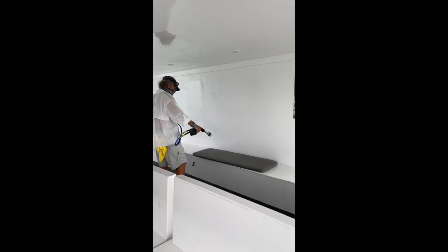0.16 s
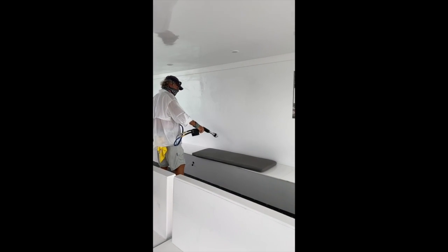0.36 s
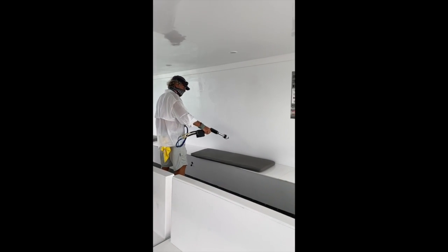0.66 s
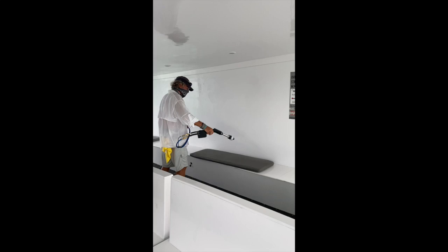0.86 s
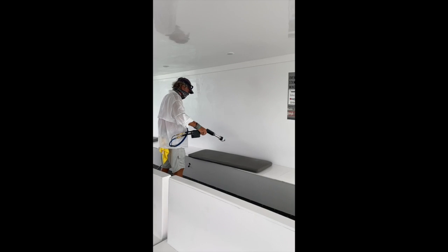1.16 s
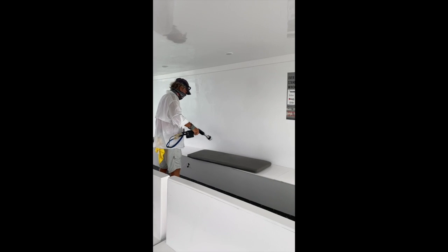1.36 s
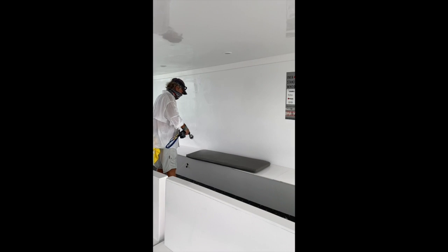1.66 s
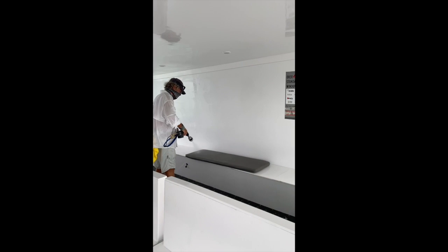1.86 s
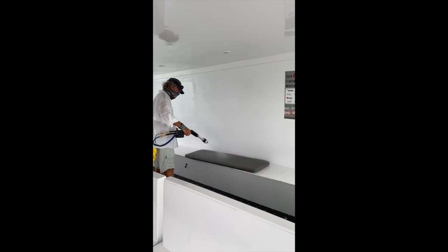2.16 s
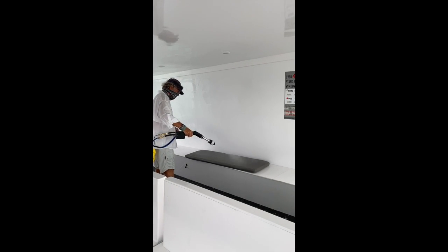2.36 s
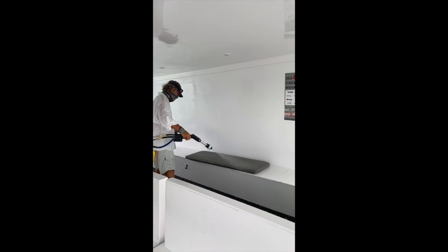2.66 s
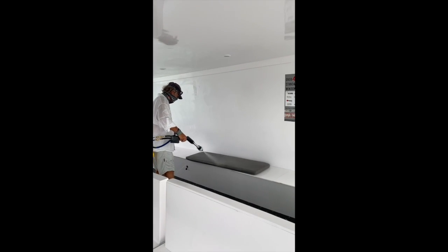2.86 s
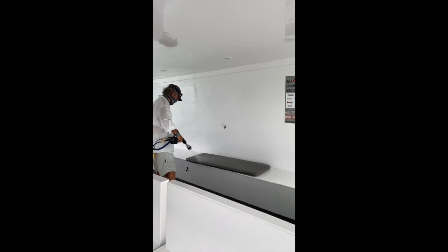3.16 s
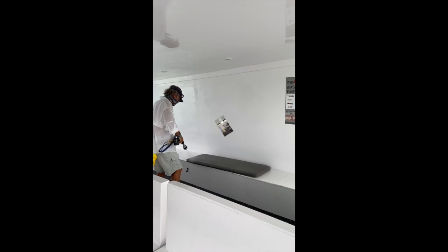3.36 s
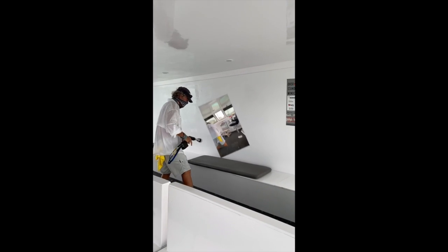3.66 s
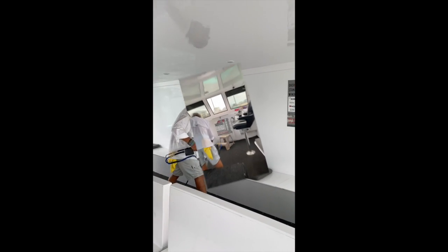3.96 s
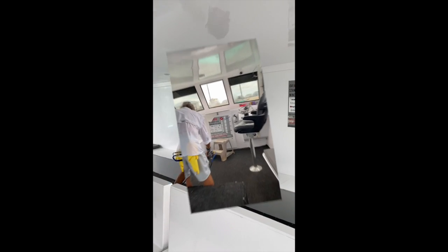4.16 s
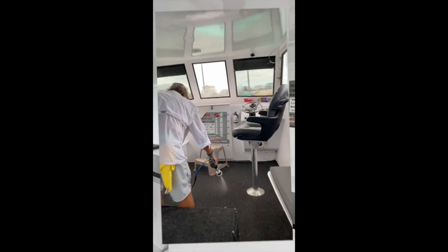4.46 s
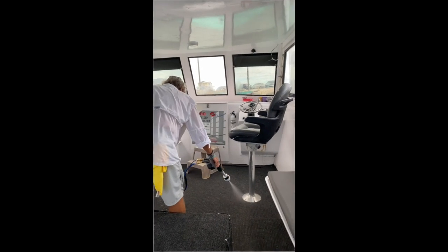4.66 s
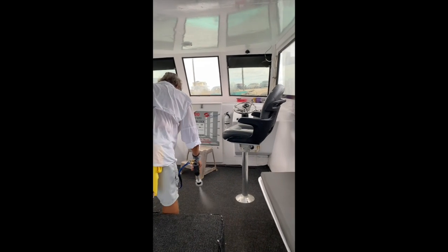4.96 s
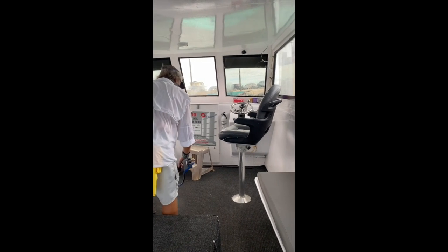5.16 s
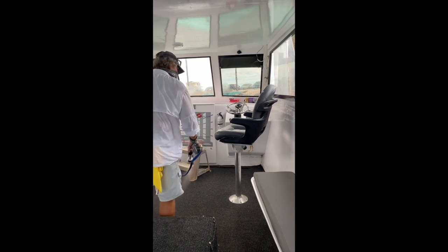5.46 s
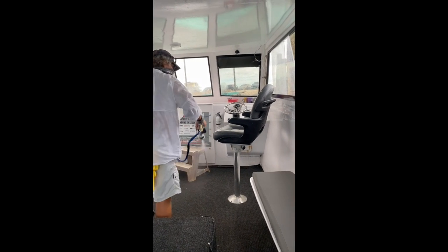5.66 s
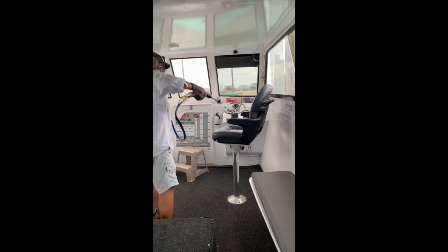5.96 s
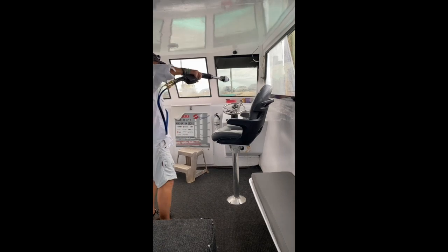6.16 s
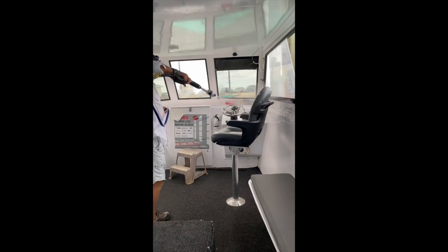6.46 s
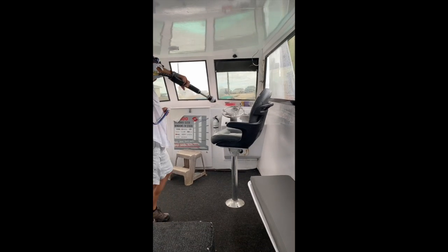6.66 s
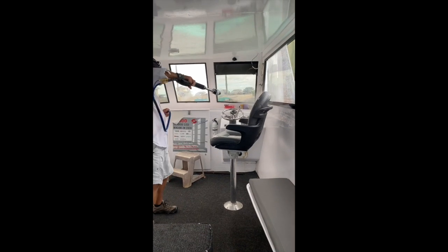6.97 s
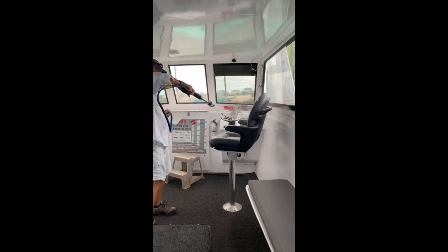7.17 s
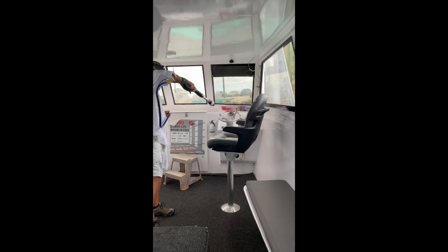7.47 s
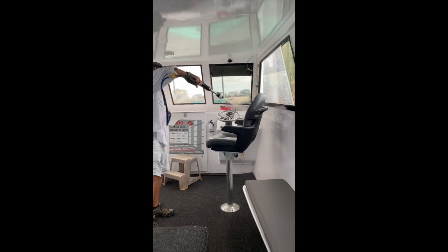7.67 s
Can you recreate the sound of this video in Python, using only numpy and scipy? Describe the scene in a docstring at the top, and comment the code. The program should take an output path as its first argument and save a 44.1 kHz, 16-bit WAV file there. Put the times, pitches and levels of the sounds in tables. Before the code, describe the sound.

A handheld spray gun hisses without a break for about 7.8 seconds inside a boat. The hiss is bright, dense and wide, with fine droplet ticks and subtle sweeping colour from nearby reflections. From 0 to 3.3 s it sprays seats, wavering gently and easing around 1.8 s. It dips near 3.5 s while the sound crossfades to the helm until about 4.3 s. Lower rushing and splashing strengthen near 5 s; the hiss rises at 6 s, peaks around 6.4 s, then fluctuates slightly lower. Underneath, two engines hum faintly with slow beating over soft hull rumble. A thin high whine surfaces around 1.2 s and 2.2-2.9 s; a faint hollow drone swells around 6.5-7.3 s. Dull floor thuds occur throughout, clearest as a low double bump at 4.7 s, with soft scuffs around 5, 6.6 and 7.3 s.

```python
"""A spray gun hisses first: its hose-fed mist falls on the seats and floor of a boat's saloon, then at the helm.
The hiss is filtered noise with ticking drops; reflections and wandering colour sweep through it as the gun is waved.
The mist also rushes and splashes lower down. Soft thuds are fading sines; scuffs are short swells of low noise.
Behind it, two engines of slightly different speed hum and beat as sums of sines, over a noisy hull rumble.
A thin whine and a hollow drone come and go."""
import sys
import numpy as np
from scipy import signal
from scipy.fft import rfft, irfft, next_fast_len
from scipy.io import wavfile
from scipy.ndimage import uniform_filter1d, map_coordinates

SR = 44100
rng = np.random.default_rng(int(sys.argv[2]) if len(sys.argv) > 2 else 0)


def put_to_file(sound):
    """Save the sound as 16-bit audio at rate SR, in the file named by the first command-line argument."""
    columns = np.atleast_2d(sound).T  # one column per channel
    safe = np.clip(columns, -1, 1)
    whole_steps = np.round(safe * 32767)
    wavfile.write(sys.argv[1], SR, whole_steps.astype(np.int16))


N = 344862

# Hiss as the gun turns towards and away from the listener, before small trims and drifts: t/s, level/dB
GUN_LEVEL = [(0, -37), (0.3, -35), (0.95, -36.5), (1.45, -36.5), (1.8, -38), (2.2, -35), (2.75, -35.5),
             (3.15, -37), (3.42, -38.5), (3.52, -41.0), (3.72, -38.7), (4.1, -37.5), (4.22, -38),
             (4.75, -35.5), (5.0, -35.5), (5.16, -37.5), (5.5, -35.5), (5.77, -37), (5.9, -34.7),
             (6.03, -32), (6.13, -32.5), (6.4, -31.0), (6.6, -34.0), (6.8, -32), (7.08, -31.8), (7.28, -35),
             (7.66, -33), (7.82, -34)]
# Colour of the spray, relative and per Hz, before a low cut: f/Hz, saloon level/dB, helm level/dB
SPRAY_COLOUR = [(500, -30, -29.3), (750, -27, -26.5), (1050, -24.4, -23.8), (1400, -23.4, -23),
                (2000, -19.7, -19.7), (2550, -16.2, -14.2), (2900, -15.3, -13.8), (3300, -15.2, -15),
                (3800, -14, -12.9), (4450, -11.3, -11.4), (5150, -12, -11.8), (5800, -10.2, -10.2),
                (6650, -10, -9), (7700, -7.3, -6.2), (8400, -7.2, -4.9), (9500, -4.6, -3.4),
                (10800, -3, -2.4), (12350, -5.2, -4), (14300, 0.2, 0.6), (15600, -1.5, -0.9)]
# Splash, which depends on the surface the mist lands on, before a small trim: t/s, level/dB
SPLASH_LEVEL = [(0, -50), (0.65, -47), (1.2, -46.5), (1.75, -50), (1.98, -49.5), (2.24, -46.5), (2.85, -48),
                (3.45, -53), (3.58, -52), (3.68, -47.5), (4.05, -49), (4.5, -48.5), (4.65, -47),
                (5.55, -47), (5.7, -48), (5.88, -47.5), (6.0, -45), (6.66, -46), (6.77, -44), (7.1, -45.5),
                (7.34, -47.5), (7.82, -46.5)]
# Bright band in the splash while the seats are sprayed: t/s, level/dB
BRIGHT_SPLASH_LEVEL = [(0.1, -68), (0.5, -56), (1.15, -54), (1.5, -62), (2.2, -60), (2.9, -64), (3.5, -70)]
# Lower rush of the mist, strongest when it lands close by: t/s, level/dB
RUSH_LEVEL = [(0, -54.8), (0.7, -53), (1.3, -54), (1.8, -55), (2.3, -53.1), (2.8, -53), (3.57, -58),
              (3.72, -53.5), (4.22, -52.5), (4.4, -51), (4.95, -50.5), (5.3, -52), (5.6, -50.5),
              (5.7, -53.5), (5.9, -56), (6.01, -51.5), (6.55, -49.5), (6.85, -50.5), (7.3, -51),
              (7.82, -52)]
# Surfaces near the nozzle: extra path/ms, swing of that path/ms, reflection level/dB
NEAR_SURFACES = [(.7, 0.093, -20), (1.5, 0.12, -20.5), (2.7, 0.199, -15.5), (5.3, 0.302, -13.5),
                 (9, 0.297, -13.5)]
# Range in which the colour of the hiss wanders: lowest f/Hz, highest f/Hz
MOTTLE_RANGE = (1200, 12500)
# How alike the left and right sides are: f/Hz, saloon likeness (0-1), helm likeness (0-1)
LIKENESS = [(199, .99, .99), (520, .8, 0.53), (1100, 0.85, .65), (1400, 1, 1), (2010, 1, 1),
            (2670, 0.26, .5), (3150, 0.56, 0.4), (3650, 0.48, .3), (4430, 0.2, 0.52), (4800, .48, 0.66),
            (5120, 0.35, 0.4), (5660, 0.98, 1), (7400, 0.94, 0.94), (8100, 0.9, 0.6), (8500, 0.7, 0.49),
            (9150, 0.64, .76), (11440, 0.83, 0.79), (13000, 1, 0.97)]
# Phase by which the left side leads, in each cabin: f/Hz, lead/rad
SALOON_LEAD = [(0, 0), (950, -0.3), (1400, 0), (1980, 0.05), (2550, 1), (3010, 0.15), (3350, .45),
               (3700, 0.2), (4310, 0.5), (4650, 2.2), (4950, 3.8), (5250, 5.9), (5510, 6.7), (5770, 6.33),
               (8100, 6.45), (9130, 8.1), (12200, 9.3), (14300, 8)]
HELM_LEAD = [(0, 0), (1980, 0), (2500, 1.0), (3400, 1.75), (4050, 1.6), (4650, 2.4), (4950, 3.6), (5250, 6),
             (5480, 6.6), (5900, 6.28), (7400, 6.33), (8150, 6.7), (8400, 7.5), (9130, 8.2), (11000, 8.65),
             (12100, 9.1), (14300, 8)]
# Band in which the two sides pass over to opposite phase: start f/Hz, end f/Hz
OPPOSED_RANGE = (11600, 12900)
# Thuds through the floor, before the gains of the floor's modes: t/s, level/dB, f/Hz, time to fade 60 dB/s
THUD_BLOWS = [(1.07, -52, 290, .12), (1.72, -48, 60, .25), (1.83, -50, 135, .2), (2.345, -48, 190, .1),
              (2.8, -51, 135, 0.18), (3.33, -48, 104, 0.22), (4.672, -40, 80, .2), (4.715, -39, 62, .16),
              (4.94, -49, 210, .1), (4.975, -46, 90, .15), (6.004, -49, 125, 0.2), (6.525, -45, 144, 0.2),
              (6.603, -47.5, 160, 0.13), (6.96, -44, 42, .3), (7.24, -44, 88, .25), (7.785, -47, 100, .2)]
# Ring of the floor: multiple of the thud's pitch, level/dB
FLOOR_RING = [(1, 2), (1.47, -13), (2.3, -16), (3.9, -16)]
# Scuffs on the floor: middle t/s, length/s, level/dB, centre f/Hz, width/Hz
FLOOR_SCUFFS = [(.93, 0.14, -56, 150, 60), (1.08, .09, -62, 295, 70), (2.85, 0.18, -57, 141, 45),
                (4.72, .13, -50, 74, 80), (4.96, .17, -56, 190, 260), (6.08, .3, -58, 150, 230),
                (6.58, .2, -55, 135, 220), (7.0, .25, -58.5, 230, 260), (7.27, .16, -54, 85, 70),
                (7.65, .2, -58.5, 220, 200)]
# Generator hum, before swell and waver: multiple of the shaft rate, saloon level/dB, helm level/dB
GENERATOR_ORDERS = [(1, -71, -73), (2, -63.5, -57.3), (3, -68.5, -73), (4, -79, -71), (5, -56.5, -63),
                    (6, -84, -69.5), (7, -67, -69), (8, -74, -77), (9, -81, -70.5), (10, -76, -77),
                    (11, -70.5, -69), (12, -76.5, -70), (13, -76, -78), (14, -69.5, -73.5),
                    (15, -71.5, -84), (16, -67.5, -86), (17, -80, -86), (18, -81, -89), (19, -90, -72),
                    (20, -79, -80), (21, -79, -75), (28, -76, -85), (34, -75.5, -84), (38, -81, -80)]
# Second engine, before swell and waver: multiple of the shaft rate, saloon level/dB, helm level/dB
ENGINE_ORDERS = [(2, -71, -59.7), (4, -80, -67), (5, -73, -85), (6, -71, -74), (7, -73.5, -78),
                 (9, -80, -81), (15, -70.5, -83), (17, -78, -77), (19, -88, -77.5), (22, -81, -76.5),
                 (29, -82, -77), (36, -78.5, -74)]
# The hum swells in the saloon and sinks on the way to the helm: t/s, change of level/dB
HUM_CHANGE = [(0, -1.5), (0.9, 0), (2.7, 1), (3.3, 0), (3.7, -2), (4.1, -1.8), (4.6, 0), (5.6, .5),
              (7.82, -.7)]
# Colour of the hull's rumble, relative and per Hz: f/Hz, level/dB
RUMBLE_COLOUR = [(20, -18), (40, -9), (75, 0), (130, -4), (200, -3), (300, -6), (450, -6), (650, -7),
                 (1100, -9), (2500, -27)]
# Thin whine, before its waver: t/s, level/dB
WHINE_LEVEL = [(0, -75), (0.5, -72), (1.25, -67), (1.6, -79), (2.2, -69), (2.9, -68.5), (3.2, -79),
               (5.5, -78), (7.82, -77)]
# Hollow drone: t/s, level/dB
DRONE_LEVEL = [(6.2, -76), (6.47, -66), (6.9, -67), (7.3, -69), (7.7, -75)]

# Shaft rates before a slight wander
GENERATOR_HZ, SALOON_ENGINE_HZ, HELM_ENGINE_HZ = 30.55, 28.08, 28.17
# The hull's rumble and its deep boom, before their swells
SALOON_RUMBLE_DB, HELM_RUMBLE_DB = -65.6, -64.5
SALOON_BOOM_DB, HELM_BOOM_DB = -70, -66.5
# The saloon gives way to the helm in one even fade
FADE_START_S, FADE_LENGTH_S = 3.35, 0.97
# Around its usual level, the hiss also moves its own top and the upper rumble, by these shares of its swing
USUAL_HISS_DB, SHEEN_FOLLOWS, RUMBLE_FOLLOWS = -36, 0.16, 0.59
TOP_HZ = 15700  # where the recorder starts to cut the treble


def spray(flutter_db=0.3, eddy_db=0.4, hiss_trim_db=0.03, splash_trim_db=0.1, hand_db=0.25):
    """Turbulence at the nozzle hisses; the mist rushes and splashes lower down, by the surface it is aimed at."""
    rush_hz, splash_hz, sheen_hz = 2700, 5200, 9500  # top of the rush, top of the splash, start of the sheen
    hiss_db, splash_db = level_curve(GUN_LEVEL), level_curve(SPLASH_LEVEL)
    jet = mottle(nozzle_jet())
    # cut the jet into parts, each brought to a known level
    rush = shape(jet, below(rush_hz)) / band_rms(jet, (1100, 2600))
    splash = shape(jet, below(splash_hz) - below(rush_hz)) / band_rms(jet, (3000, 4600))
    hiss = shape(jet, 1 - below(splash_hz)) / band_rms(jet, (5500, 10500))
    # the top of the hiss is the narrowest beam, so it swings further than the rest
    sheen = shape(hiss, 1 - below(sheen_hz))
    sheen_gain = undb(SHEEN_FOLLOWS * (hiss_db - USUAL_HISS_DB))
    hiss = hiss + sheen * (sheen_gain - 1)
    bright = rubbed(4350, width_hz=600)
    # the unsteady hand sways the narrow beam of hiss
    parts = (
        (rush, level_curve(RUSH_LEVEL)),
        (splash, splash_db + splash_trim_db),
        (bright, level_curve(BRIGHT_SPLASH_LEVEL)),
        (hiss, hiss_db + hiss_trim_db + hand_db * walk(rate=12)),
    )
    # each part has eddies of its own, and the flow flutters as a whole
    mist = sum(part * undb(db + eddy_db * walk(rate=20)) for part, db in parts)
    return mist * undb(flutter_db * walk(rate=35))


def nozzle_jet(low_hz=480):
    """Turbulent noise and drops take on the colour and stereo width of each cabin, and fade from one to the other."""
    helm = helm_share()
    hz, saloon_db, helm_db = np.transpose(SPRAY_COLOUR)
    saloon_alike, helm_alike = side_likeness()
    low_cut = bins() ** 2 / (bins() ** 2 + low_hz ** 2)
    cabins = (
        (1 - helm, SALOON_LEAD, saloon_db, saloon_alike),
        (helm, HELM_LEAD, helm_db, helm_alike),
    )
    jet = 0
    for share, lead, db, alike in cabins:
        turbulence = rng.standard_normal(N) + droplets()
        pair = stereo_pair(reflect(turbulence), rng.standard_normal(N), lead, alike)
        pair = shape(pair, colour(np.transpose([hz, db])) * low_cut)
        jet = jet + np.sqrt(share) * pair / band_rms(pair, (3000, 10500))
    return jet


def droplets(per_s=300, size_db=0.5):
    """Single drops tick inside the hiss as one-sample clicks; sizes are relative to the turbulence."""
    chance = rng.random(N)
    size = rng.exponential(size=N) * rng.choice((-1, 1), N)
    return (chance < per_s / SR) * size * undb(size_db)


def reflect(x):
    """Near surfaces echo the nozzle; their paths change as the hand moves, so faint combs sweep through the hiss."""
    out, t = x, clock()
    for path_ms, swing_ms, db in NEAR_SURFACES:
        lag_s = (path_ms + swing_ms * walk(rate=1.3)) / 1000
        # read the noise between its samples, for a smoothly moving delay
        echo = map_coordinates(x, [(t - lag_s) * SR], order=3, mode="wrap")
        out = out + undb(db) * echo
    return out


def mottle(x, depth_db=1.0, rate=11., count=30):
    """The hiss changes colour as the gun moves: narrow bands swell and hollow out, each at its own time."""
    size = next_fast_len(N)
    spectrum, out = rfft(x, size), 0
    hz = np.arange(size // 2 + 1) * SR / size
    place = np.interp(hz, MOTTLE_RANGE, (0, count - 1))
    for k in range(count):
        # triangular bands overlap so that their gains add up to 1
        triangle = np.maximum(1 - abs(place - k), 0)
        band = irfft(spectrum * triangle, size)[:, :N]
        out = out + band * undb(depth_db * walk(rate=rate))
    return out


def stereo_pair(common, apart, phase, likeness):
    """A stereo pair from noise: partly alike, one side leading in phase; the top treble is set in opposite phase."""
    opposed = np.interp(bins(), OPPOSED_RANGE, (0, 1))
    likeness = 1 - (1 - likeness) * (1 - opposed)
    # three half turns put the two sides in opposite phase
    lead = (1 - opposed) * np.interp(bins(), *np.transpose(phase)) + opposed * 3 * np.pi
    sides = np.array([[1], [-1]])
    alike_part = rfft(common) * np.sqrt(1 + likeness)
    differing_part = sides * rfft(apart) * np.sqrt(1 - likeness)
    return irfft((alike_part + differing_part) * np.exp(.5j * sides * lead), N)


def side_likeness():
    """Likeness of the left and right sides per bin, in the saloon and at the helm."""
    hz, *cabins = np.transpose(LIKENESS)
    return [np.clip(np.interp(bins(), hz, alike), 0, 1) for alike in cabins]


def thuds(contact_s=0.0073):
    """Soft blows, as of steps and the dragged hose, ring the floor; its higher modes die sooner."""
    out, t = np.zeros(N + SR), np.arange(SR // 2) / SR
    soft_start = 1 - np.exp(-t / contact_s)
    for s, db, hz, t60 in THUD_BLOWS:
        ring = 0
        for ratio, mode_db in FLOOR_RING:
            fade = np.exp(-np.log(1000) * t * np.sqrt(ratio) / t60)
            ring = ring + undb(mode_db) * np.sin(2 * np.pi * hz * ratio * t) * fade
        start = int(s * SR)
        out[start:start + len(t)] += undb(db) * ring * soft_start
    return out[:N]


def scuffs():
    """Feet and hose rub over the floor: short, hollow swells of rumble."""
    out, t = 0, clock()
    for s, length, db, hz, width in FLOOR_SCUFFS:
        swell = np.exp(-(2 * (t - s) / length) ** 2)
        out = out + undb(db) * swell * rubbed(hz, width)
    return out


def engine(shaft_hz, orders, wander=0.00098, waver_db=1.0, upper_waver_db=1.7):
    """A governed shaft hums at multiples of its turning rate; each cabin favours its own ones."""
    turns = np.cumsum(shaft_hz * (1 + wander * walk(rate=3))) / SR
    out = 0
    for multiple, saloon_db, helm_db in orders:
        size = undb(by_cabin(saloon_db, helm_db))
        tone = np.sqrt(2) * np.sin(2 * np.pi * (round(multiple) * turns + rng.random()))
        # short waves change more as people move about the cabin
        depth_db = np.interp(multiple, (5, 12), (waver_db, upper_waver_db))
        out = out + size * undb(depth_db * walk(rate=5)) * tone
    return out


def hull(swell_db=0.9, boom_hz=140):
    """Broad noise of machinery rumbles under the hum, with a deeper boom; both swell a little by chance."""
    helm_alike = side_likeness()[1]
    noise = stereo_pair(*rng.standard_normal((2, N)), HELM_LEAD, helm_alike)
    noise = shape(noise, colour(RUMBLE_COLOUR))
    rumble = shape(noise, 1 - below(boom_hz)) / band_rms(noise, (170, 330))
    boom = shape(noise, below(boom_hz)) / band_rms(noise, (70, 135))
    # the upper rumble rises and falls with the spray
    with_spray_db = RUMBLE_FOLLOWS * (level_curve(GUN_LEVEL) - USUAL_HISS_DB)
    rumble_db = by_cabin(SALOON_RUMBLE_DB, HELM_RUMBLE_DB) + with_spray_db
    boom_db = by_cabin(SALOON_BOOM_DB, HELM_BOOM_DB)
    return (rumble * undb(rumble_db) + boom * undb(boom_db)) * undb(swell_db * walk(rate=9))


def whine(hz=1101, waver_db=1.5, wander_hz=1.2):
    """A thin whine of the machinery, one wandering sine, comes and goes."""
    turns = np.cumsum(hz + wander_hz * walk(rate=4)) / SR
    gain = undb(level_curve(WHINE_LEVEL) + waver_db * walk(rate=6))
    return gain * np.sqrt(2) * np.sin(2 * np.pi * turns)


def drone(hz=366, width_hz=32):
    """A hollow drone of narrow-band noise, faint at first, swells for about a second at the helm."""
    return undb(level_curve(DRONE_LEVEL)) * rubbed(hz, width_hz)


def rubbed(hz, width_hz):
    """Noise in one resonance, with an rms level of 1."""
    x = shape(rng.standard_normal(N), resonance(hz, width_hz))
    return x / np.std(x)


def helm_share():
    """Share of the sound that comes from the helm, 0-1."""
    return np.clip((clock() - FADE_START_S) / FADE_LENGTH_S, 0, 1)


def by_cabin(saloon, helm):
    """A value that passes from the saloon's to the helm's."""
    return saloon + (helm - saloon) * helm_share()


def undb(db):
    """Decibels to gain."""
    return 10 ** (np.asarray(db) / 20)


def clock():
    """Time of every sample in s."""
    return np.arange(N) / SR


def bins():
    """Frequency of every spectral bin in Hz."""
    return np.arange(N // 2 + 1) * SR / N


def level_curve(table):
    """Level in dB at every sample, with the table's points joined by straight lines."""
    return np.interp(clock(), *np.transpose(table))


def colour(points):
    """Gain per bin from points of frequency in Hz and level in dB."""
    hz, db = np.transpose(points)
    return undb(np.interp(np.log(bins() + 1), np.log(hz), db))


def below(hz):
    """Steep low-pass gain per bin."""
    return 1 / (1 + (bins() / hz) ** 6)


def resonance(hz, width_hz):
    """Gain per bin of a steep resonance."""
    return 1 / (1 + ((bins() - hz) / (.5 * width_hz)) ** 4)


def shape(x, gain):
    """Filter by a gain per bin."""
    return irfft(rfft(x) * gain, N)


def band_rms(pair, band):
    """Level of the centre of a stereo pair within a band."""
    inside = (bins() > band[0]) & (bins() < band[1])
    return np.std(shape(pair.mean(0), inside))


def walk(rate):
    """Smooth random drift with a spread of about 1, heading for a new value `rate` times a second."""
    k = max(int(SR / rate), 1)
    held = np.repeat(rng.standard_normal(N // k + 2), k)
    smooth = uniform_filter1d(uniform_filter1d(held, k), k)
    return 1.3 * smooth[:N]  # smoothing shrinks the spread


def scene():
    """Spray in front, over the stereo hull; hum, whine, drone, thuds and scuffs are the same on both sides."""
    second_engine_hz = by_cabin(SALOON_ENGINE_HZ, HELM_ENGINE_HZ)
    hum = engine(GENERATOR_HZ, GENERATOR_ORDERS) + engine(second_engine_hz, ENGINE_ORDERS)
    hum = hum * undb(level_curve(HUM_CHANGE))
    return spray() + thuds() + scuffs() + hum + hull() + whine() + drone()


def record(dry):
    """The recorder cuts the top steeply."""
    steep_cut = signal.ellip(12, .1, 80, TOP_HZ, fs=SR, output="sos")
    return signal.sosfilt(steep_cut, dry)


dry = scene()
out = record(dry)
put_to_file(out)
```